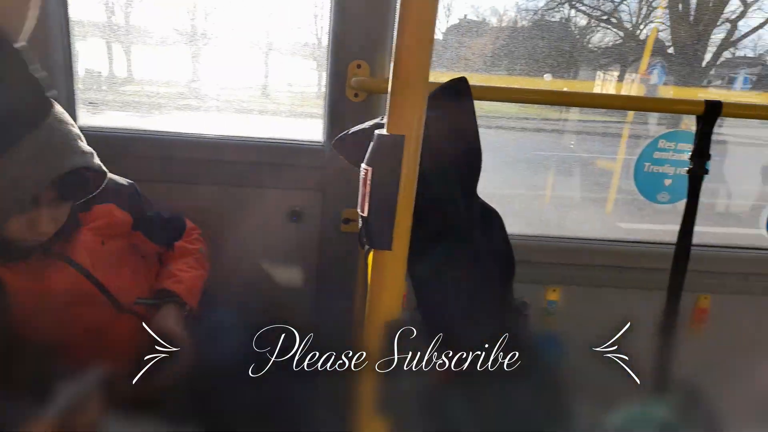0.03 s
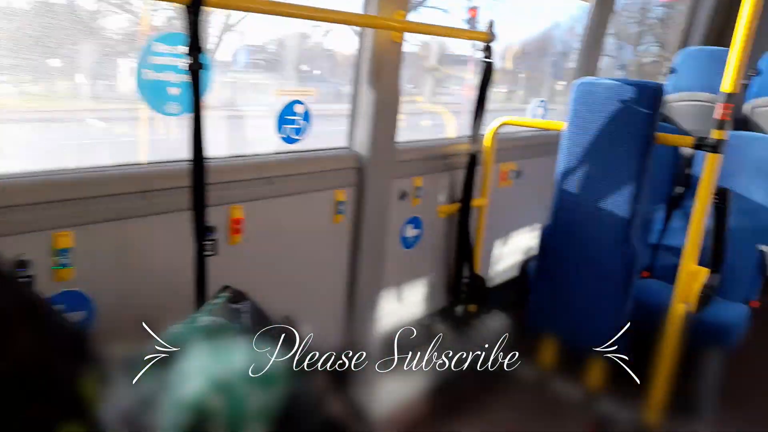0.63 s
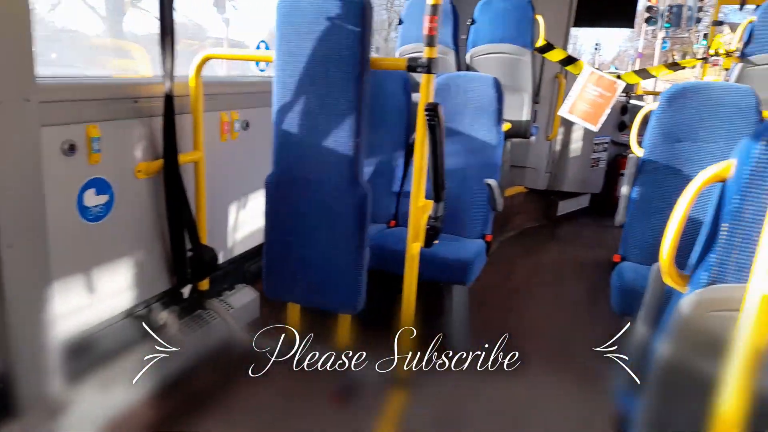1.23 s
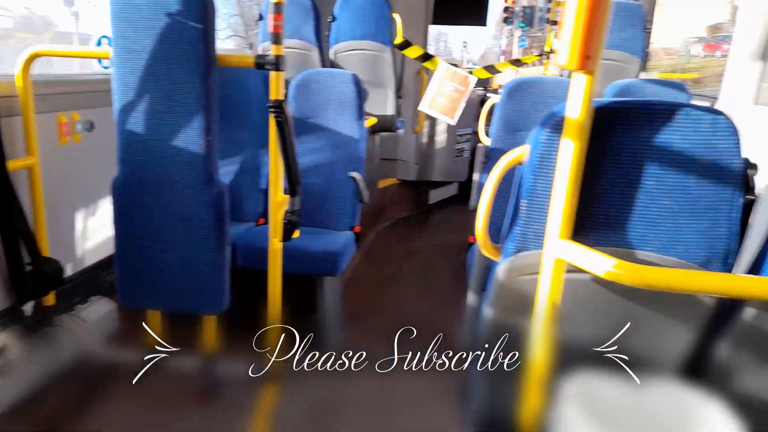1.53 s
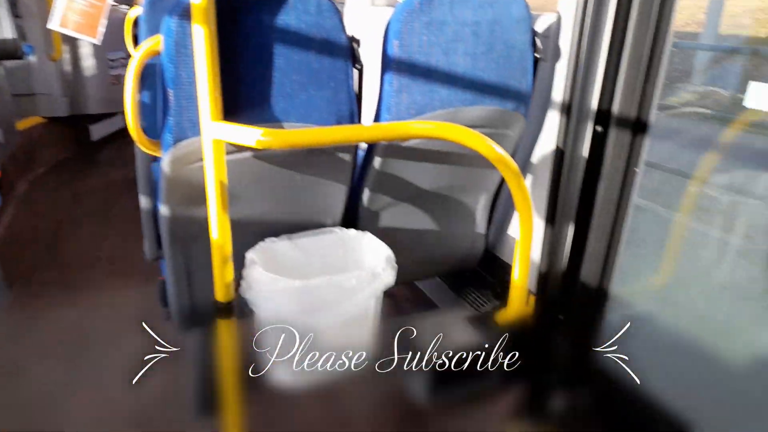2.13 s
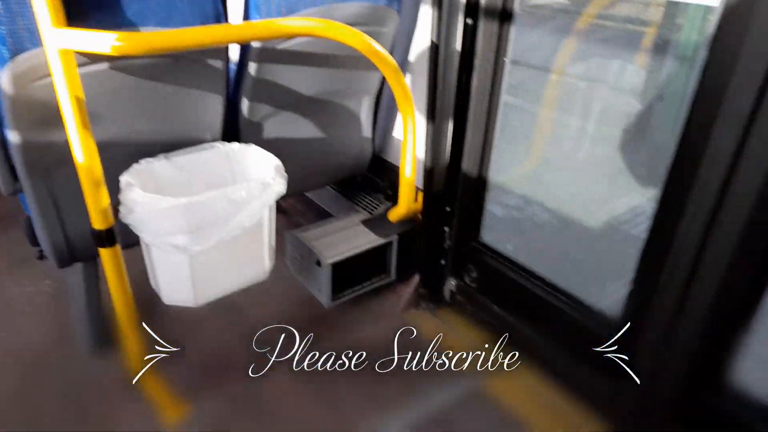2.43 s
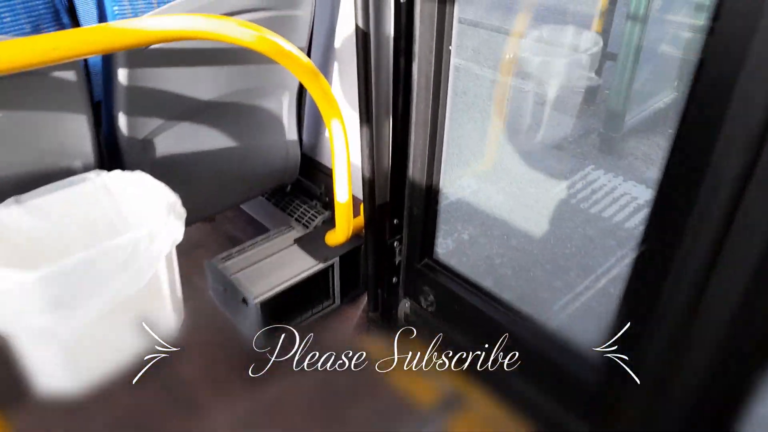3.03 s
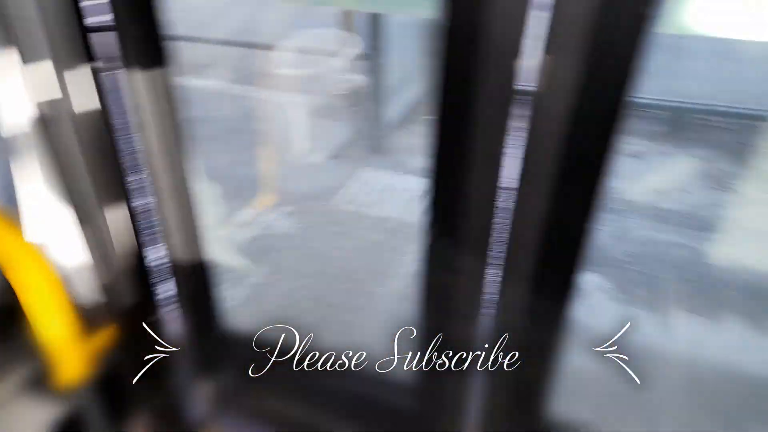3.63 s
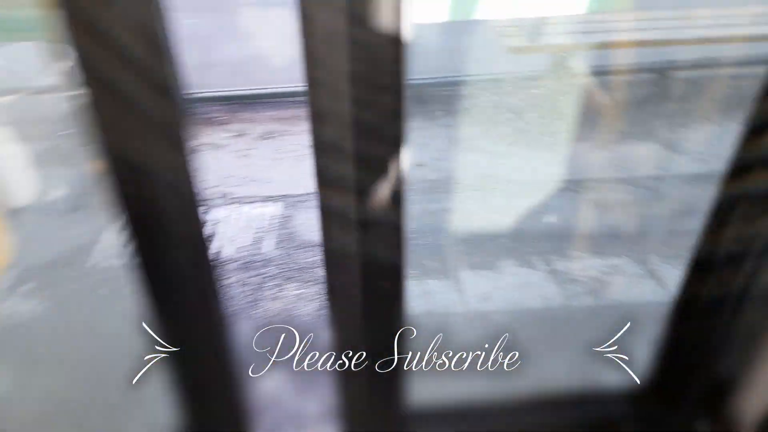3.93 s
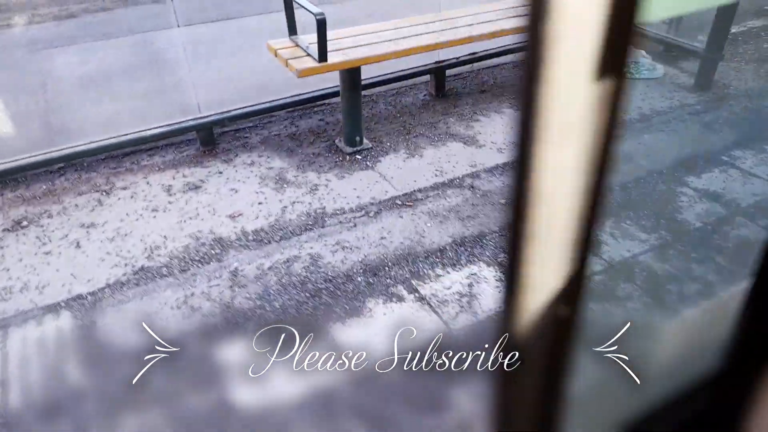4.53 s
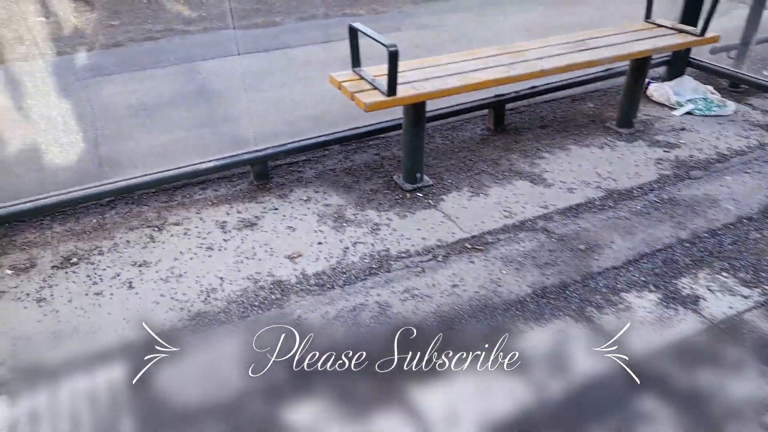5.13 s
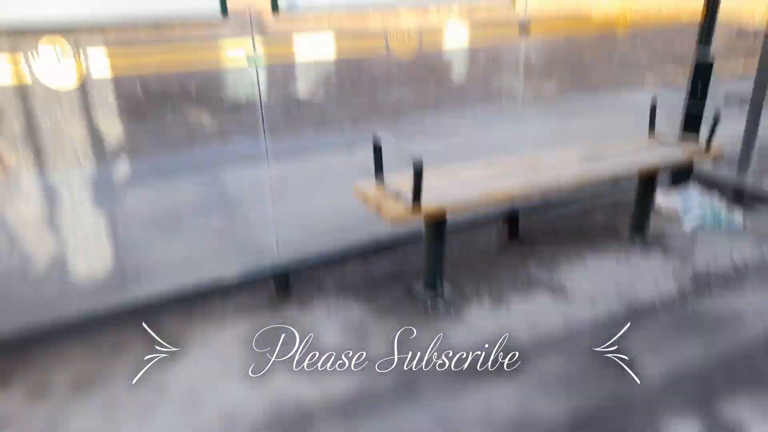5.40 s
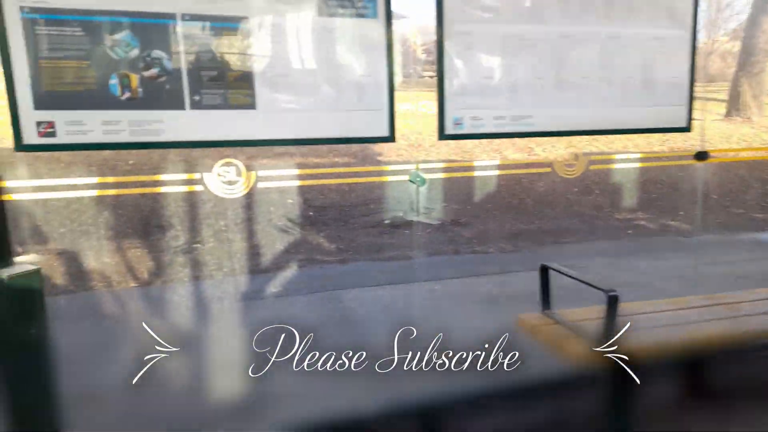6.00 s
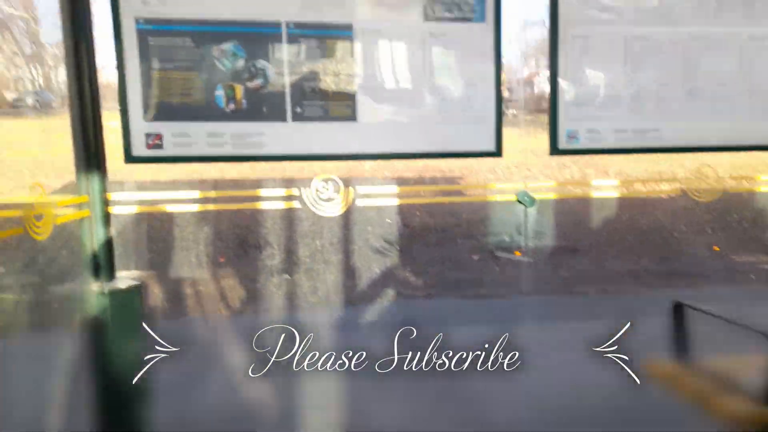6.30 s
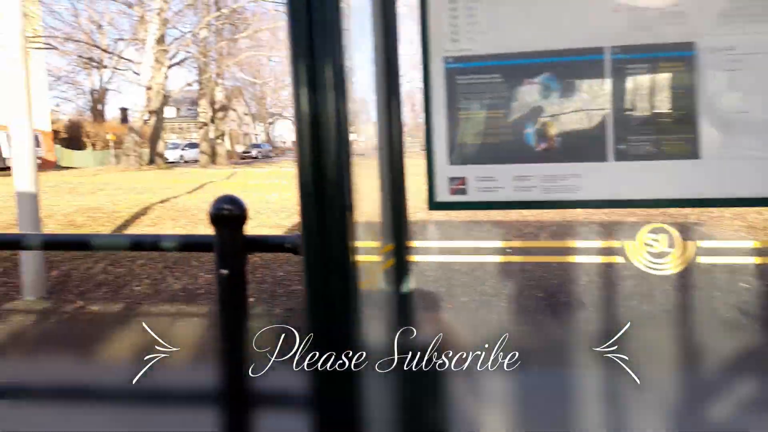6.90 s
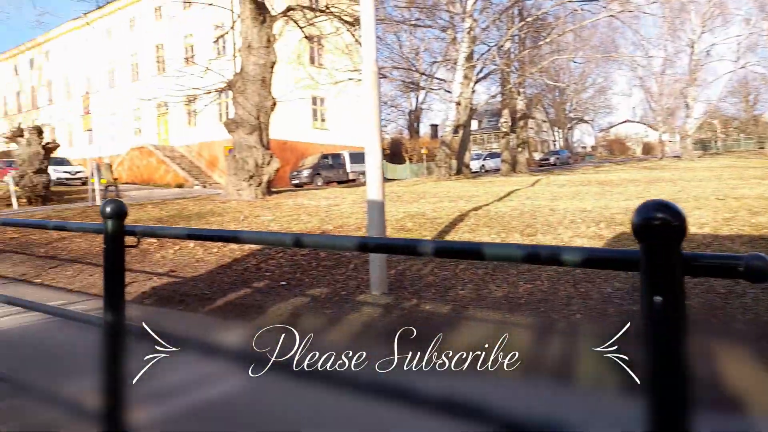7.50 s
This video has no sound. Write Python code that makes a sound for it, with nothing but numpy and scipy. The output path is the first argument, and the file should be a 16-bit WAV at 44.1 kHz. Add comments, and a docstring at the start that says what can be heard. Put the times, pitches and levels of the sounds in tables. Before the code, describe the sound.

Inside an idling bus, footsteps thud, then the door opens with a long, whistling hiss of air as someone steps out.

```python
"""Stepping off an idling bus

A passenger's feet thud on the floor while the engine hums. A valve lets the door's air out in
a long hiss, and the door panels clunk free and swing open. As the pressure falls, the vent
whistles. Clothes rustle, shoes scuff over the sill, and a gust buffets the right microphone."""
import sys
import numpy as np
from scipy import signal
from scipy.fft import rfft, irfft, next_fast_len
from scipy.io import wavfile
from scipy.ndimage import uniform_filter1d

SR = 44100
rng = np.random.default_rng(int(sys.argv[2]) if len(sys.argv) > 2 else 0)


def int16_out(signal):
    """Quantize to a 16-bit WAV file."""
    q = np.round(np.clip(np.atleast_2d(signal).T, -1, 1) * 32767)
    wavfile.write(sys.argv[1], SR, q.astype(np.int16))


N = 341775
TIME = np.arange(N) / SR
DOOR_SWING, STEP_OUT = (3.75, 0.46), (6.32, 0.37)  # each is (start [s], length [s])

# How strongly air flows out of the vent: (time [s], level [dB])
AIR_FLOW = [(3, -32), (3.5, -36.5), (4.2, -37.5), (4.7, -36.5), (5.45, -38), (5.8, -36), (6.15, -42.5),
            (6.6, -56.5), (7.05, -58.5), (7.3, -77)]
# Tone colour of the rushing air, or how strong each pitch is: (frequency [Hz], level [dB])
RUSH_COLOUR = [(400, -10), (1000, -7.5), (2000, -6.5), (2700, -5.5), (3400, -1), (4100, 1.5), (4900, -1),
               (5300, -2), (6000, -3), (7000, -1), (7900, -4), (9500, -10), (16000, -28)]
# The thin fizz on top of the rush: (frequency [Hz], level [dB])
FIZZ_COLOUR = [(5000, -27), (7500, -38), (8800, -8.5), (9600, 2.5), (10400, 0.5), (12000, -1.5),
               (13800, -1.5), (15000, -6.5), (16000, -3.5)]
# Pitches that the vent's duct boosts: (frequency [Hz], width [Hz], gain [dB])
DUCT_PEAKS = [(1940, 49, 9.5), (3700, 130, 2), (5420, 130, 3), (9580, 230, 2), (13900, 200, 4)]
# How the hiss changes once the door has swung aside: (frequency [Hz], gain [dB])
OPEN_COLOUR = [(1500, 0.2), (2900, -4), (4000, -2), (4400, 1.4), (6800, 1), (7600, -2), (8200, -7),
               (9000, -8), (9800, -3), (10600, 0.9), (12100, -1), (13500, 0), (14500, 3), (16000, 3)]
# Sharp spurts of air; "fade" always means the time to die away by 60 dB:
# (time [s], level [dB], rise [s], fade [s], treble tilt [dB per octave])
SPURTS = [(2.956, -34, 0.0012, 0.13, 4), (2.993, -20, 0.0032, .16, 14), (3.012, -23.5, 0.0065, 0.14, 1),
          (3.403, -26, 0.02, .1, 3.5), (3.55, -31.5, 0.015, 0.27, -3), (6.238, -31.5, 0.011, 0.15, -1.5)]
# Tone colour of the spurts: (frequency [Hz], level [dB])
SPURT_COLOUR = [(1000, -12), (3000, -7), (3950, 2), (5200, -1), (6600, 8.5), (8500, -8), (10200, 6),
                (12500, 2), (16000, -3.5)]

def door_air():
    """A valve snaps open and air hisses out, turning brighter as the door uncovers the vent."""
    flow_db = curve(AIR_FLOW)[0]
    valve_open, uncovered = ramp(start=2.993, length=0.0044), ramp(start=4.7, length=0.1)
    rush = noise(RUSH_COLOUR) * amp(flow_db - 1.4 * uncovered) * sides(pan_db=-1.5)
    fizz = noise(FIZZ_COLOUR) * amp(flow_db + 1.5 + 3 * uncovered) * sides(pan_db=3)
    hz = np.fft.rfftfreq(N, 1 / SR)
    duct_db = sum(db / (1 + (2 * (hz - centre) / width) ** 2) for centre, width, db in DUCT_PEAKS)
    jet = valve_open * irfft(rfft(rush + fizz) * amp(duct_db), N)
    jet *= amp(0.55 * drift(30))  # the level flickers slightly
    open_share = 0.9 * uncovered
    jet = (1 - open_share) * jet + open_share * filtered(jet, OPEN_COLOUR)
    return echoes(jet, strength=0.99, spread_s=0.009, sway_s=0.0001217) + bursts(SPURTS, SPURT_COLOUR)


def echoes(x, strength, spread_s, sway_s, count=8):
    """Sound bounces off glass and walls along paths that shift as the passenger moves."""
    out, samples = x.copy(), np.arange(N)
    for side in range(2):
        for distance, rate, phase, coin in rng.random((count, 4)):
            sway = 1 + np.sin(2 * np.pi * (rate * TIME / 2 + phase))
            delay_s = spread_s * distance + sway_s * sway
            echo = np.interp(samples - delay_s * SR, samples, x[side], left=0)
            out[side] += np.sign(coin - 0.5) * strength / np.sqrt(count) * echo
    return out * x.std() / out.std()


# Moments when pressure hits the pipe: (time [s], level [dB], rise [s], fade [s])
PIPE_RINGS = [(2.957, -34.5, .001, 0.1), (3.02, -35, 0.081, 0.69)]
# The narrow band in which the pipe rings: (frequency [Hz], level [dB])
PIPE_COLOUR = [(2500, -30), (3600, -8), (4000, -3), (4250, 2), (4600, -14), (6500, -35)]

def pipe():
    """Air forced through the valve's pipe makes it ring."""
    return bursts([(*row, 0) for row in PIPE_RINGS], PIPE_COLOUR)


# Pairs of tones, each held until the next: (time [s], main tone [Hz], second tone [Hz], level [dB])
WHISTLES = [(4.7, 4370, 4100, -51), (4.851, 4370, 4690, -42.5), (5.38, 4220, 4430, -49.5),
            (5.62, 4425, 4190, -44.5), (6.02, 4440, 4150, -42.5), (6.281, 4470, 4130, -47),
            (6.591, 4380, 4080, -46), (6.84, 4240, 4140, -51)]

def whistles():
    """Air whistles on the vent's edge, hopping in pitch as the flow weakens; swirls break it up."""
    last_end_s, crossfade_s, second_tone_db = 7.18, 0.06, -4.5
    waver = 1 + 0.0015 * drift(30) + 0.005 * drift(400)
    flutter = amp(1.8 * np.array([drift(45), drift(45)]))
    main, second = (unit_level(1 + depth * np.tanh(2 * drift(16))) for depth in (0.45, 0.95))
    ends = [row[0] for row in WHISTLES[1:]] + [last_end_s]
    tones = [(6.325, 6.405, 14040, -45, main)]  # one thin, overblown squeak
    for (start, main_hz, second_hz, db), end in zip(WHISTLES, ends):
        tones += [(start, end, main_hz, db, main), (start, end, second_hz, db + second_tone_db, second)]
    out = np.zeros((2, N))
    for start, end, hz, db, strength in tones:
        span = slice(round((start - crossfade_s / 2) * SR), round((end + crossfade_s / 2) * SR))
        t = TIME[span]
        fade = np.minimum(np.minimum(t - t[0], t[-1] - t) / crossfade_s, 1) ** 2
        phase = 2 * np.pi * np.cumsum(hz * waver[span]) / SR
        right_shift = np.pi * (rng.random() - 0.5)
        tone = np.sqrt(2) * np.sin([phase, phase + right_shift])
        add(out, t[0], amp(db) * fade * strength[span] * flutter[:, span] * tone)
    return out


# Notes at which the floor and walls ring: (frequency [Hz], level [dB], fade [s])
BODY_NOTES = [(84, -18.5, 0.22), (132.8, -4, 0.085), (163.4, 1.5, 0.095), (211, -2.5, 0.067),
              (235.3, -4.5, 0.11), (299, -11.5, 0.086), (430, -19, 0.066), (521, -27.5, 0.059)]

def thud(rise, fade, pitch):
    """One hard push and the shaking after it make the body of the bus ring."""
    shake_colour = [(40, -17), (150, 2), (500, 2), (1500, -37), (5000, -40)]
    force = envelope(rise, fade) * noise(shake_colour, SR // 2)
    force[:, round(rise * SR)] += 300  # the push
    return struck(force, BODY_NOTES, pitch)


# Feet and door hitting the bus:
# (time [s], thud [dB], rise [s], fade [s], pitch [factor], clack [dB], boom [dB])
KNOCKS = [(.353, -21, .001, 0.18, 1.16, -36, -45), (.384, -16, .0028, 0.16, 1.21, -36.5, -44),
          (1.017, -12, .001, .23, .98, -30, -24.5), (3.303, -25.5, .016, .3, 1.43, -27.5, -36),
          (3.341, -16, .0087, 0.35, 1.42, -25.5, -36), (3.411, -23, .025, 0.29, 1.13, -37, -42),
          (3.984, -21.5, .028, 0.39, 1.75, -23, -37), (4.026, -20, .02, .48, 1.05, -34, -25),
          (5.812, -17, .02, 0.37, 1.14, -27.5, -22), (5.844, -16.5, .017, .17, 1.17, -33, -30),
          (7.584, -35.5, 0.0118, 0.08, 0.77, -41, -52)]
# Tone colour of two surfaces meeting: (frequency [Hz], level [dB])
CONTACT_COLOUR = [(20, -70), (150, -14), (450, 5), (800, 6), (1200, 0), (1600, -2.5), (2200, -4),
                  (2700, -6.5), (3600, -7.5), (5000, -9.5), (7000, -15), (8500, -21), (10000, -14),
                  (16000, -35)]

def steps_and_knocks():
    """Each hit clacks where it lands and thuds in the walls; the floor booms a moment later."""
    boom_delay_s = 0.046
    out = np.zeros((2, N))
    for start, thud_db, rise, fade, pitch, clack_db, boom_db in KNOCKS:
        clack = envelope(rise, 0.94 * fade) * noise(CONTACT_COLOUR, SR // 2, tilt_db=-0.7)
        add(out, start, amp(clack_db) * sides(pan_db=0.5) * clack)
        add(out, start, amp(thud_db) * thud(rise, fade, pitch))
        add(out, start + boom_delay_s, amp(boom_db) * thud(rise=0.0101, fade=0.36, pitch=0.53))
    return out


# Door seals and soles rubbing:
# (time [s], level [dB], rise [s], fade [s], treble tilt [dB per octave], left over right [dB])
SCUFFS = [(2.995, -44, 0.012, .3, 1, -6), (3.555, -31.5, 0.022, .35, 5.5, -1),
          (5.25, -33, 0.0088, 0.23, -8.5, 3), (6.14, -30.5, 0.01, 0.21, 1, -3),
          (6.738, -33.5, .011, 0.074, -2.5, -5.5), (6.86, -38.5, 0.084, 0.38, -5, -11)]
# Grit under the shoes: (time [s], level [dB])
GRIT = [(7.222, -42), (7.387, -43), (7.415, -37.5), (7.497, -39), (7.53, -40), (7.663, -39.5)]

def scuffs_and_grit():
    """The door's seals and the shoes scuff, then grit ticks underfoot."""
    rise_s, fade_s = 0.001, 0.04
    ticks = [(start, db, rise_s, fade_s, 0) for start, db in GRIT]
    return bursts(SCUFFS + ticks, CONTACT_COLOUR)


# Loose metal parts shaking: (time [s], level [dB], fade [s])
RATTLES = [(1.836, -39.5, 0.24), (2.125, -49, .37), (2.265, -46.5, 0.32), (3.993, -28, 0.13),
           (6.153, -34, 0.13), (7.525, -46.5, .15)]
# Notes at which those parts ring: (frequency [Hz], level [dB], fade [s])
METAL_NOTES = [(1588, 0.5, 0.06), (1800, -1.5, .03), (2020, 2, 0.028), (2280, 3.5, 0.039),
               (2705, -4, 0.036), (3140, -0.5, 0.02), (3760, 5, 0.0092), (5180, -0.5, 0.0089),
               (6370, -6, .01)]

def rattles():
    """A loose metal part chatters in a spray of tiny taps."""
    out = np.zeros((2, N))
    for start, db, fade in RATTLES:
        taps = rng.standard_normal((2, SR // 2)) ** 3  # cubing makes the noise spiky
        add(out, start, amp(db) * struck(envelope(rise=0.0055, fade=fade) * taps, METAL_NOTES))
    return out


# The low roar of the gust: (frequency [Hz], level [dB])
GUST_COLOUR = [(20, -25), (60, -9), (130, 0), (230, 1), (330, -6.5), (500, -14), (800, -23), (1500, -47),
               (4000, -64)]
# The deeper murmur of the breeze: (frequency [Hz], level [dB])
BREEZE_COLOUR = [(20, -19), (70, -2.5), (130, 1), (250, -12), (500, -26), (2000, -51)]

def wind():
    """A gust buffets and slaps the right microphone; then a breeze dies down, mostly on the left."""
    gust_end_s, release_s, slap_s, slap_hz, breeze_s = 6.43, 0.07, 6.149, 190, 6.81
    strength = ramp(start=5.91, length=0.083) * np.exp(-np.maximum(TIME - gust_end_s, 0) / release_s)
    buffet = noise(GUST_COLOUR) * strength * amp(-21 + 3.5 * np.tanh(drift(40)))
    swing = (np.pi * slap_hz * (TIME - slap_s)) ** 2
    slap = amp(-0.5) * (2 * swing - 1) * np.exp(-swing)  # a single swing of pressure
    breeze_db = -41 - 4 * np.maximum(TIME - breeze_s, 0) + 4 * np.tanh(drift(14))
    breeze = noise(BREEZE_COLOUR) * ramp(breeze_s, length=0.032) * amp(breeze_db)
    return (buffet + slap) * amp([[-17], [0]]) + breeze * sides(pan_db=15.5)


# Soft swishes of cloth: (middle [s], level [dB], length [s])
SWISHES = [(.08, -49, .45), (0.376, -47, 0.27), (.61, -50, .38), (1.222, -49, 0.43), (1.84, -50, 0.19),
           (2.17, -51, 0.23), (2.695, -55, .3), (6.803, -54, 0.3), (7.568, -53, .25)]
# Quick brushes of cloth and zips: (time [s], level [dB], rise [s], fade [s], treble tilt [dB per octave])
BRUSHES = [(.376, -34, .004, 0.083, -4.5), (.99, -37.5, .001, .015, 7), (2.455, -45, 0.02, 0.17, 2.5)]
# Tone colour of rubbing cloth: (frequency [Hz], level [dB])
RUSTLE_COLOUR = [(1000, -18), (2500, -6), (4200, 1.5), (5500, -0.5), (7300, -0.5), (8500, -10), (9800, 4.5),
                 (12000, 1), (14500, -0.5), (16000, -10.5)]

def clothes():
    """Cloth rubs faintly all the time, and swishes or brushes with each movement."""
    inside_db, outside_db = -55.5, -60
    power = amp(inside_db + (outside_db - inside_db) * ramp(*STEP_OUT)) ** 2
    for middle, db, length in SWISHES:
        power += (amp(db) * np.exp(-(2 * (TIME - middle) / length) ** 2)) ** 2
    rustle = noise(RUSTLE_COLOUR) * np.sqrt(power) * amp(1.3 * drift(25))
    left, right = rustle + bursts(BRUSHES, RUSTLE_COLOUR)
    return np.array([filtered(left, [(5000, -1.9), (10000, -0.27)]),
                     filtered(right, [(5000, 1.5), (10000, -3.5)])])


# The engine's hum along the aisle: (time [s], firing tone [dB], octave above [dB])
ENGINE_LEVELS = [(0, -52, -27.5), (1.1, -35, -30.5), (2.1, -40, -35.5), (2.9, -31.5, -34.5),
                 (4.3, -42, -41), (6.3, -41.5, -37.5), (7.75, -56, -69)]

def engine():
    """The idling engine's firing makes a low, wavering tone and another an octave above."""
    firing_hz = 61.9
    firing_db, octave_db = curve(ENGINE_LEVELS)
    phase = 2 * np.pi * np.cumsum(firing_hz * (1 + 0.011 * drift(5))) / SR
    firing = amp(firing_db + 2.1 * drift(4)) * np.sin(phase)
    octave = amp(octave_db + 0.95 * drift(6.1)) * np.sin(2 * phase)
    return firing + octave


# Rumble of the bus, swelling as the passenger crosses the sill: (time [s], level [dB])
RUMBLE_LEVELS = [(0, -30.5), (2, -32.5), (3.3, -30), (5.55, -35), (5.88, -27), (6.65, -43), (7.75, -43)]
# Tone colour of the rumble: (frequency [Hz], level [dB])
RUMBLE_COLOUR = [(20, -25), (35, -16), (50, 1), (70, -2), (95, -8), (145, 2.5), (190, 1), (240, -5.5),
                 (310, -2.5), (400, -13.5), (520, -17), (800, -28.5), (1500, -35), (4000, -83)]
# The even wash of fans and street: (frequency [Hz], level [dB])
WASH_COLOUR = [(150, -1.5), (500, 3.5), (900, 0), (1400, -4.5), (2100, -6), (2600, -8.5), (3200, -10.5),
               (4500, -14.5), (7000, -24), (8500, -23.5), (10000, -26), (16000, -41)]

def bus_and_street():
    """The body of the bus rumbles; fans and street are loudest in the open doorway."""
    shut_db, doorway_db, outside_db = -45.5, -41, -44.5
    rumble = noise(RUMBLE_COLOUR) * amp(curve(RUMBLE_LEVELS)[0] + 1.15 * drift(10)) * sides(pan_db=1.3)
    wash_db = shut_db + (doorway_db - shut_db) * ramp(*DOOR_SWING)
    wash_db += (outside_db - doorway_db) * ramp(*STEP_OUT)
    return rumble + noise(WASH_COLOUR) * amp(wash_db + 1.5 * drift(15))


# How alike the two microphones sound: (frequency [Hz], likeness [0 to 1])
LIKENESS = [(30, 0.48), (60, 0.91), (125, 0.94), (250, 0.91), (500, 0.54), (1000, 0), (16000, 0.054)]

def noise(colour, size=N, tilt_db=0):
    """Stereo noise of a given tone colour, with left and right alike in the bass."""
    length = next_fast_len(size)
    hz = np.fft.rfftfreq(length, 1 / SR)
    left, other = rfft(rng.standard_normal((2, length)))
    alike = np.clip(look_up(LIKENESS, hz), -1, 1)
    right = alike * left + np.sqrt(1 - alike ** 2) * other
    gain = amp(look_up(colour, hz) + tilt_db * np.log2(hz + 1))
    x = irfft(np.array([left, right]) * gain, length)[:, :size]
    return x / x.mean(0).std()


def bursts(rows, colour):
    """One short puff of noise per row; a last, optional column moves it left or right."""
    out = np.zeros((2, N))
    for start, db, rise, fade, tilt_db, *pan in rows:
        add(out, start, amp(db) * sides(sum(pan)) * envelope(rise, fade) * noise(colour, SR // 2, tilt_db))
    return out


def struck(force, notes, pitch=1):
    """A force rings an object's own notes; the loudest moment is scaled to a level of one."""
    t = np.arange(force.shape[1]) / SR
    ring = sum((-1) ** k * amp(db - 60 * t / fade) * np.sin(2 * np.pi * hz * pitch * t)
               for k, (hz, db, fade) in enumerate(notes))
    sound = signal.fftconvolve(force, ring[None], axes=1)[:, :len(t)]
    return sound / np.sqrt(uniform_filter1d(sound.mean(0) ** 2, size=1000).max())


def envelope(rise, fade):
    """Half a second of loudness that rises smoothly, then dies away."""
    t = np.arange(SR // 2) / SR
    attack = np.sin(np.pi / 2 * np.minimum(t / rise, 1))
    return attack * np.exp(-np.log(1000) * np.maximum(t - rise, 0) / fade)


def drift(rate_hz):
    """A smooth random wobble; a higher rate makes it quicker."""
    hz = np.fft.rfftfreq(N, 1 / SR)
    return unit_level(irfft(rfft(rng.standard_normal(N)) * np.exp(-(hz / rate_hz) ** 2), N))


def filtered(x, colour):
    """Turns each frequency up or down by a tone colour table."""
    return irfft(rfft(x) * amp(look_up(colour, np.fft.rfftfreq(N, 1 / SR))), N)


def look_up(points, hz):
    """Reads between the rows of a frequency table, spaced by octaves."""
    frequencies, values = np.transpose(points)
    return np.interp(np.log(hz + 1), np.log(frequencies + 1), values)


def curve(rows):
    """Joins the rows of a time table with straight lines, one curve per value column."""
    times, *columns = np.transpose(rows)
    return [np.interp(TIME, times, column) for column in columns]


def ramp(start, length):
    """Goes from 0 to 1 over the given seconds."""
    return np.clip((TIME - start) / length, 0, 1)


def amp(db):
    """Turns decibels into a gain."""
    return 10 ** (np.asarray(db) / 20)


def sides(pan_db):
    """Left and right gains; above zero favours the left."""
    return amp(np.array([[0.5], [-0.5]]) * pan_db)


def unit_level(x):
    """Scales to an average power of one."""
    return x / np.sqrt(np.mean(x ** 2) + 1e-20)


def add(mix, start, sound):
    """Mixes in a stereo sound at a time in seconds."""
    part = mix[:, round(start * SR):][:, :sound.shape[1]]
    part += sound[:, :part.shape[1]]


def scene():
    """All the sounds together, in stereo."""
    door = door_air() + pipe() + whistles()
    background = engine() + bus_and_street() + clothes()
    return door + background + steps_and_knocks() + scuffs_and_grit() + rattles() + wind()


def record(dry):
    """Cuts off the very highest treble."""
    cutoff_hz = 15900
    low_pass = signal.firwin(801, cutoff_hz, window=("kaiser", 9), fs=SR)
    return signal.oaconvolve(dry, low_pass[None], "same", axes=1)


dry = scene()
out = record(dry)
int16_out(out)
```